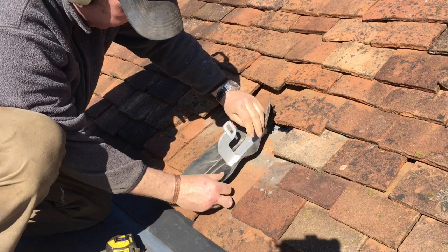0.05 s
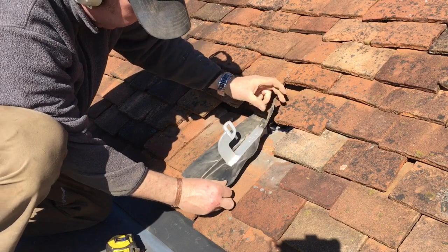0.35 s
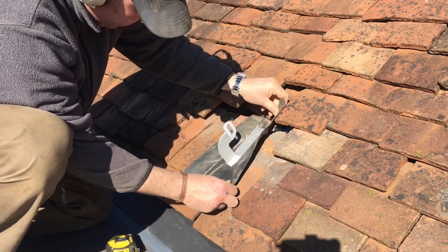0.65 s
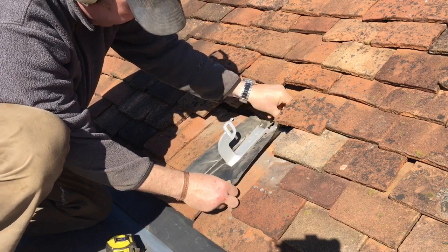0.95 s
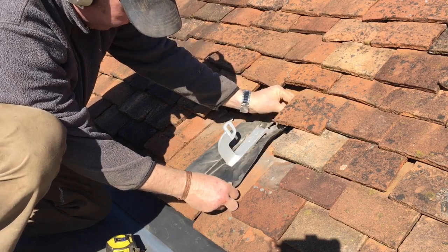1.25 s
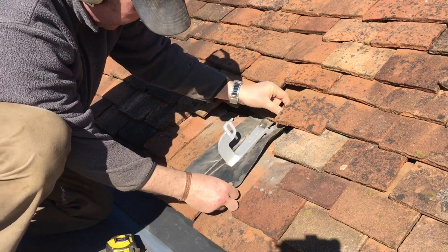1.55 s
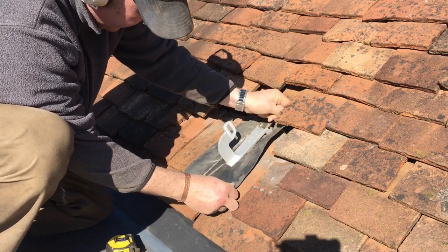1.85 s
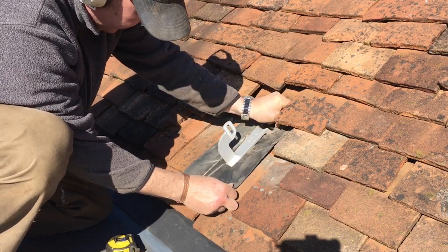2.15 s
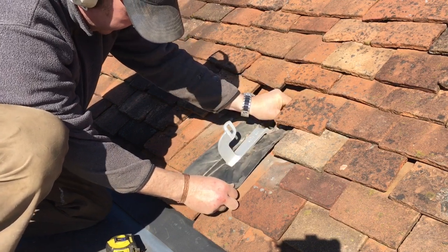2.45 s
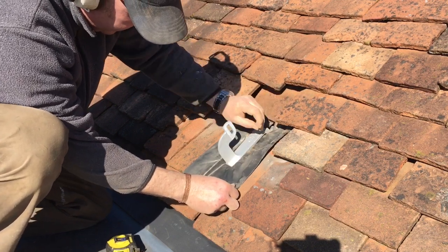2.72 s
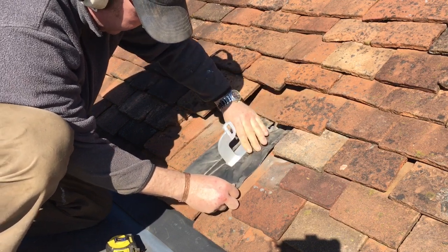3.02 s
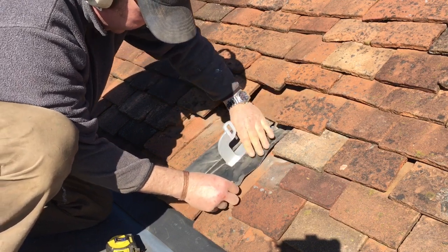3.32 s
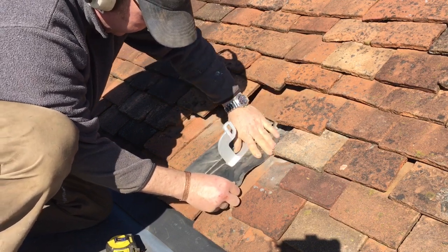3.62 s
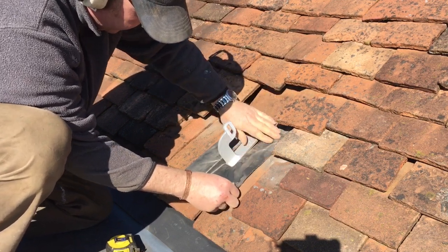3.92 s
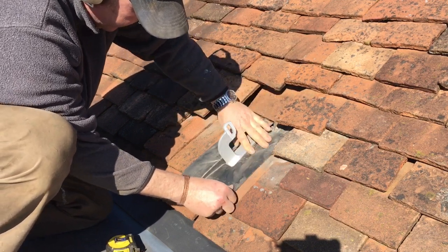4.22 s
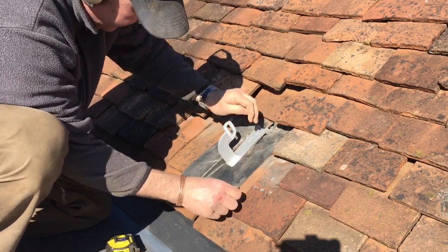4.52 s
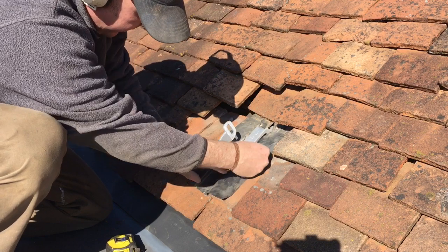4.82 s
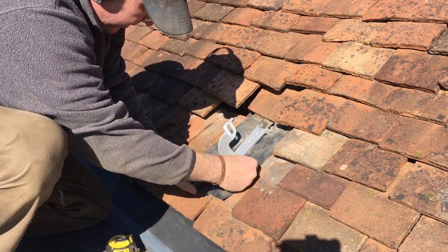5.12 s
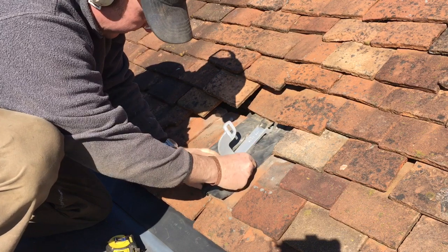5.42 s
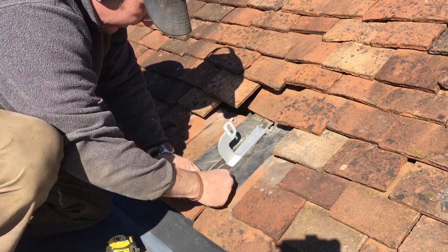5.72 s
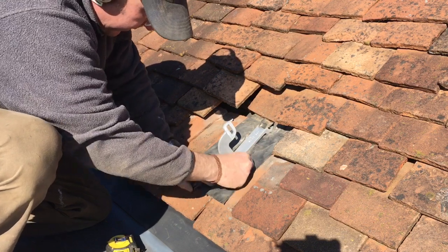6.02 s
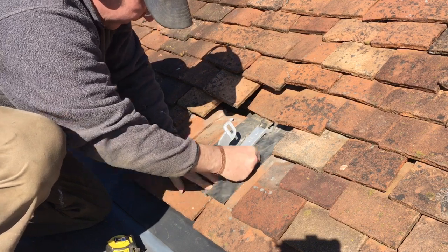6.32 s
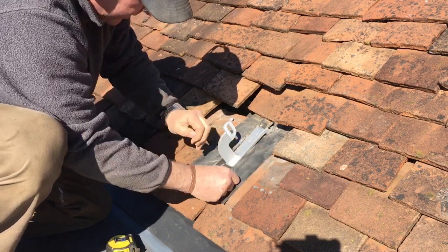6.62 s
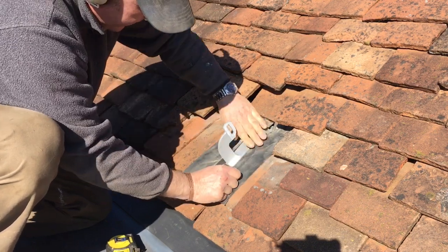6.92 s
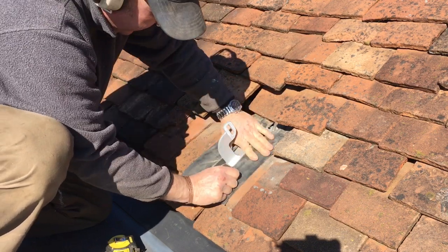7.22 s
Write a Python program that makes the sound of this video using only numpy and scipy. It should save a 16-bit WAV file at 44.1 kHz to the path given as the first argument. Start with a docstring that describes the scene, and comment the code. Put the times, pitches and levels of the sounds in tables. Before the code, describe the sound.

On a tiled roof, a loose clay tile is nudged by hand, grinding and ringing briefly, with dull thuds from the wood beneath. A palm rubs a metal sheet flat, a metal hook slides over grit in jerks, and the sheet scrapes across clay. Then the hook is lightly tapped into place. Sleeves swish throughout, light wind rumbles on the close microphone, and a few thin dry ticks come through.

```python
"""A roofer fits a metal hook and its flashing (a metal sheet) among clay tiles in a light wind.
First a loose tile is nudged, and it grinds and rings. At about 3 s a palm rubs the flashing flat,
then the hook slides over grit in jerks. Seated tiles clack, the flashing scrapes over the clay
near 5 s, and from 5.6 s the hook is tapped home. All along, sleeves swish, the battens (wooden
strips under the tiles) thud, wind rumbles on the microphone and a thin dry tick comes and goes."""
import sys
import numpy as np
from scipy import signal
from scipy.fft import rfft, irfft, next_fast_len
from scipy.io import wavfile
from scipy.ndimage import uniform_filter1d

SR = 44100
rng = np.random.default_rng(int(sys.argv[2]) if len(sys.argv) > 2 else 0)


def unload_wav(signal):
    """Save mono or channel-first audio to the path in sys.argv[1] as 16-bit WAV at rate SR, clipped to [-1, 1]."""
    wavfile.write(
        sys.argv[1],
        SR,
        np.round(np.clip(np.atleast_2d(signal).T, -1, 1) * 32767).astype(np.int16),
    )


N = 324135

# Levels in a table are relative: the functions add their own gains.
# A mode is a tone that an object rings at. Its ring time (t60) is how long it takes to fade by 60 dB.
# Jerks of the sliding hook: (time [s], contact length [s], level [dB], brightness [dB/octave])
HOOK_SLIDES = [(3.258, 0.011, -51.5, -2), (3.288, 0.0094, -54, -1.5), (3.415, 0.022, -61.5, -2.5),
               (3.445, 0.027, -48, -1), (3.53, 0.0066, -46.5, 0), (3.543, 0.0059, -51.5, -3),
               (3.557, 0.011, -52, 2), (3.576, 0.013, -46, -1), (3.62, 0.0072, -51, 0),
               (3.665, 0.016, -46.5, 0.5), (3.733, 0.0075, -48, -0.5), (3.751, 0.0078, -60.5, 4),
               (3.947, 0.032, -42.5, -1.5), (3.96, 0.019, -42, -3), (3.985, 0.024, -64, -7.5),
               (4.126, 0.0033, -50, -0.5), (4.139, 0.0055, -54.5, -1), (4.18, 0.011, -51.5, 1.5),
               (4.433, 0.0015, -57, 0.5)]
# Taps on the hook: (time [s], level [dB], brightness [dB/octave])
HOOK_TAPS = [(5.581, -55, -2), (5.622, -52.5, -1.5), (5.694, -60, 5), (5.715, -60.5, 2),
             (6.002, -53.5, 5.5), (6.068, -50, 0.5), (6.236, -59, -1), (6.39, -59.5, -1),
             (6.43, -51.5, 1.5), (6.506, -61, 0), (6.513, -49, 2.5), (6.801, -60, -1.5), (6.815, -40.5, 1),
             (6.859, -56.5, 0.5), (6.97, -70, 2), (7.026, -54.5, 2), (7.031, -62, 6.5), (7.048, -59, -1),
             (7.058, -66, 2), (7.093, -60.5, 1), (7.101, -51, 0.5), (7.123, -59, 3), (7.132, -56, 1),
             (7.138, -56.5, 0.5), (7.154, -65, 2), (7.161, -63, 2), (7.25, -59.5, 6), (7.285, -46.5, -1)]
# The hook's tones: (pitch [Hz], level when slid [dB], level when tapped [dB], free ring time [s])
HOOK_MODES = [(345, -7, -12, 0.07), (666, -11, -21, 0.066), (1026, -1.5, -3.5, 0.05),
              (1220, 1.5, 3.5, 0.026), (1559, 5, 1, 0.067), (1620, 5, -7, 0.01), (1775, -10, -13, 0.056),
              (2105, 5, 3, 0.015), (2281, 2, 6.5, 0.054), (2420, -3, -1.5, 0.016), (2950, -3, -11, 0.06),
              (3150, -25, -3, 0.016), (3830, 1, -2.5, 0.028), (4360, -5, -20, 0.05), (4650, -14, -4, 0.047),
              (4960, -12, -3, 0.012), (6380, -9.5, -7, 0.15), (7170, -12, -12, 0.05),
              (7470, 2.5, -3, 0.036), (7700, -2, -9, 0.023), (8200, 0, -13, 0.025), (8640, 1, -14, 0.034),
              (9600, -5, -18, 0.033), (12480, -10, -26, 0.02)]
# Nudges of the loose tile and knocks on seated ones:
# (time [s], contact length [s], level [dB], brightness [dB/octave], freedom to ring [dB])
TILE_NUDGES = [(0.093, 0.0028, -66.5, 0.5, -8), (0.153, 0.0012, -67, -3.5, -2),
               (0.249, 0.0027, -79, 3.5, -10), (0.346, 0.025, -66.5, -3, 23), (0.548, 0.00099, -63, 0, -11),
               (0.584, 0.0083, -47.5, -0.5, 10), (0.652, 0.0067, -67.5, -0.5, -23),
               (0.68, 0.011, -75, -5, -10), (0.764, 0.0058, -64, -4, -12), (0.832, 0.013, -59.5, 0.5, -25),
               (1.017, 0.031, -67, 0.5, 0), (1.126, 0.00085, -63.5, -5.5, -12),
               (1.163, 0.025, -66.5, -6.5, -10), (1.397, 0.01, -66.5, -2, -1),
               (1.433, 0.00063, -67, -1, -2), (1.519, 0.00395, -54.5, -5, 9), (1.541, 0.0056, -64, -6, 4),
               (1.632, 0.0025, -71.5, -2, 3), (1.803, 0.011, -70.5, -5.5, -20),
               (1.812, 0.0014, -68.5, 3, -19), (1.89, 0.0065, -66.5, -6, -3),
               (1.975, 0.022, -68, -1.5, -17), (2.033, 0.0032, -61, 0.5, -15),
               (2.349, 0.0035, -60.5, -1, -24), (2.368, 0.0015, -64.5, 1.5, -8),
               (2.388, 0.002, -72.5, -4, -6), (2.508, 0.016, -62, 1.5, -27), (2.954, 0.0044, -64, -3.5, -9),
               (2.973, 0.0082, -57.5, -4.5, -13), (3.011, 0.0064, -62.5, -3.5, -12),
               (3.378, 0.0024, -72, -3, -10)]
TILE_KNOCKS = [(0.7275, 0.0027, -39, 2.5, 9.5), (4.214, 0.00067, -41.5, 0.9, -6.5),
               (4.812, 0.0016, -54, -2.5, -5.5), (4.848, 0.0012, -62.5, 0.5, -5),
               (4.989, 0.0012, -52.5, 2, -9), (5.183, 0.0032, -50, -1.5, -18),
               (5.275, 0.0013, -60, 3.5, -11), (5.323, 0.011, -58, 2.5, -8),
               (5.386, 0.018, -60.5, -0.5, -15), (5.905, 0.013, -62, 5, -6)]
# The hook's edge rasps on the loose tile: (time [s], contact length [s], level [dB], brightness [dB/octave])
TILE_RASPS = [(0.557, 0.036, -52, 3), (0.571, 0.0077, -48, -0.5), (1.495, 0.017, -52.5, -0.5),
              (1.538, 0.011, -61, 6.5), (1.663, 0.015, -55, -1.5), (1.784, 0.003, -55, 5.5),
              (2.034, 0.032, -48.5, -0.5), (2.928, 0.007, -45, -0.5), (2.966, 0.0037, -61, 8)]
# Tones of a loose and a seated tile: (pitch [Hz], level [dB], free ring time [s])
LOOSE_TILE_MODES = [(568, -16.5, 0.1), (740, -13, 0.087), (1300, 8, 0.45), (1397, 2, 0.096),
                    (1840, -4.5, 0.028), (2090, -1, 0.015), (2266, 1, 0.07), (2608, -0.5, 0.064),
                    (2840, -1.5, 0.016), (3280, -11, 0.035), (3430, 0, 0.062), (3930, -0.5, 0.023),
                    (4780, -8.5, 0.023), (5400, -13, 0.05), (6800, -15, 0.055), (7960, -7, 0.041),
                    (8600, -15, 0.038)]
SEATED_TILE_MODES = [(348, -6, 0.093), (944, 2.5, 0.035), (1360, -9, 0.14), (1493, 5.5, 0.025),
                     (2060, 2, 0.079), (2460, 0, 0.027), (3035, 2, 0.051), (3220, -1, 0.028),
                     (3890, -2, 0.025), (3984, -6, 0.04), (4390, 1, 0.022), (5220, -7, 0.033),
                     (6492, -5, 0.046), (7600, -8, 0.025), (7700, -7, 0.032), (8200, 3, 0.018),
                     (8660, 4, 0.036), (12500, -3, 0.023)]
# The noisy clatter around the tones of hook and tiles: (frequency [Hz], level [dB])
SLIDE_CLATTER = [(150, -30), (300, 1.5), (500, -6), (750, -7.5), (1100, 1.5), (1360, -13), (1600, -1),
                 (2240, -10), (2700, -14.5), (4300, -15.5), (5850, -24), (7690, -17), (10500, -21),
                 (12400, -19), (15000, -28)]
TAP_CLATTER = [(150, -34), (300, -7), (700, -6), (1100, 2), (1400, -4), (1820, 2), (2280, 2), (2750, -23),
               (3500, -6), (4680, -9), (5600, -33), (6710, -23), (7430, -31), (8820, -19), (15000, -27)]
LOOSE_CLATTER = [(150, 10), (250, 0), (650, -5), (1050, 2.5), (1320, 1.5), (1730, 2.5), (2700, -27),
                 (3940, -20), (5750, -35), (7820, -16), (15000, -57)]
KNOCK_CLATTER = [(150, 9), (300, -6), (650, -24), (930, -5), (1150, 1), (1500, 6), (2440, -8.5),
                 (4200, -14), (5600, -13), (8240, -16), (10500, -10), (12400, -16), (15000, -18)]
# Borders of the four bands that a contact is split into: (frequency [Hz])
BAND_EDGES_HZ = [250, 800, 2800, 6000, 15000]
# Mix of those bands for each kind of contact: (low [dB], middle [dB], high [dB], top [dB])
SLIDE_BANDS = [-10, -1, -3.5, -14.5]
TAP_BANDS = [-8, 3.5, -7, -16.5]
NUDGE_BANDS = [-2, 6, 3, -5.5]
RASP_BANDS = [-11, -8.5, -8, -32]
KNOCK_BANDS = [-3, -0.5, -2.5, -12.5]

# A rough clay edge grinds under the fingers: (start [s], length [s], level [dB])
GRINDS = [(0.93, 0.045, -64), (1.66, 0.06, -66), (2.892, 0.039, -47.5), (2.906, 0.038, -53),
          (2.958, 0.02, -54), (3.006, 0.024, -57), (3.078, 0.02, -53.5), (3.1, 0.043, -57),
          (3.182, 0.034, -55.5), (3.44, 0.04, -56), (3.55, 0.034, -62), (3.655, 0.032, -45)]
# That edge's resonances: (pitch [Hz], width [Hz], level [dB])
EDGE_RESONANCES = [(885, 47, 3), (1440, 33, 9), (1830, 24, 3), (2410, 85, 2), (2860, 94, 5.5),
                   (3100, 110, -1), (3260, 59, 9), (3780, 44, -5), (4870, 75, -32), (6300, 88, -37)]
# The flashing is drawn over the clay: (start [s], length [s], level [dB])
FLASHING_SCRAPES = [(4.996, 0.07, -51.5), (5.107, 0.044, -54.5), (5.136, 0.06, -53.5)]
# Its hollow sound halfway through a scrape: (frequency [Hz], level [dB])
FLASHING_SPECTRUM = [(700, -37), (1050, 2), (1500, -4), (2000, 2), (2600, -7.5), (3500, -9), (5000, -15.5)]
# Weight shifts on the battens: (time [s], level [dB], hardness [dB/octave])
THUDS = [(0.119, -63, 0), (0.73, -41, 28), (1.022, -45, 9), (1.165, -33, -6), (1.52, -35.5, 10),
         (1.884, -37, -1), (3.665, -54, 15), (3.951, -38.5, 4), (3.972, -37, 8), (4.129, -59, 16),
         (4.218, -46.5, 10), (5.997, -41.5, 3), (6.434, -48.5, -28), (6.609, -42, -0.5), (6.814, -47.5, -5)]
# The battens' tones: (pitch [Hz], level [dB], ring time [s])
BATTEN_MODES = [(123.3, 7.5, 0.053), (146, -14, 0.26), (176.1, 5, 0.13), (225.3, -11, 0.25),
                (280, -5.5, 0.1), (369, -11.5, 0.087)]
# The dull rattle of the tiles on them: (frequency [Hz], level [dB])
RATTLE_SPECTRUM = [(140, 3.5), (250, -3), (400, -5.5), (650, -3.5), (950, -23.5)]

# The arm moves and the hand drags grit: (start [s], length [s], sleeve level [dB], grit level [dB])
ARM_STROKES = [(0.083, 0.11, -70.5, -73.5), (0.596, 0.79, -79, -70), (0.913, 0.064, -67.5, -52),
               (0.997, 0.12, -72, -66.5), (1.131, 0.16, -67.5, -61.5), (1.347, 0.041, -92, -66.5),
               (1.496, 0.089, -68.5, -81), (1.646, 0.15, -78, -68), (1.842, 0.075, -64, -61.5),
               (2.018, 0.07, -72, -59.5), (2.337, 0.071, -71, -60.5), (2.502, 0.12, -63.5, -60),
               (2.857, 0.19, -92, -67), (3.398, 0.095, -70, -60), (3.534, 0.29, -64.5, -61.5),
               (3.798, 0.21, -60, -62.5), (4.103, 0.046, -66, -62.5), (4.219, 0.083, -70, -61),
               (4.42, 0.086, -67.5, -67), (4.622, 0.13, -78, -69.5), (4.782, 0.033, -72, -63),
               (4.874, 0.16, -60.5, -61), (4.944, 0.17, -65, -63.5), (5.158, 0.082, -64, -58),
               (5.253, 0.14, -70.5, -63), (5.435, 0.11, -62.5, -58.5), (5.5, 0.26, -57.5, -57),
               (5.57, 0.096, -59, -58), (5.772, 0.067, -68.5, -67), (5.83, 0.094, -60, -72),
               (5.925, 0.076, -62, -56.5), (5.999, 0.19, -59, -60.5), (6.211, 0.19, -59.5, -69),
               (6.331, 0.093, -55, -55), (6.441, 0.11, -57, -61), (6.51, 0.12, -61, -65.5),
               (6.586, 0.093, -65.5, -65), (6.696, 0.091, -70.5, -83), (6.993, 0.16, -63, -74),
               (7.149, 0.31, -60.5, -63), (7.207, 0.082, -66, -70)]
# The palm rubs the flashing flat: (start [s], length [s], level [dB])
PALM_RUBS = [(3.065, 0.042, -48), (3.082, 0.12, -50.5), (3.168, 0.084, -52), (3.27, 0.11, -63)]
# The hand leans on the loose tile: (start [s], end [s])
LEANS = [(1.48, 1.74), (2.95, 3.38)]
# The sound of the sleeve, of coarse grit and of fine grit: (frequency [Hz], level [dB])
SLEEVE_SPECTRUM = [(1180, -18), (2000, -45), (2800, -11.5), (3250, -4.5), (3480, -9), (4210, -4.5),
                   (5840, -7.5), (6370, -6.5), (6890, -7), (8330, -3.5), (10300, -13), (13500, -7.5),
                   (15800, -18)]
COARSE_GRIT = [(280, 9), (420, 10), (650, 7), (1200, 5)]
FINE_GRIT = [(1000, -7.5), (1500, -1), (2100, 1), (2800, -2.5), (4000, -4.5), (5500, -11)]

# Wind strength at the microphone: (time [s], level [dB])
GUSTS = [(0, -25), (0.42, -30), (0.51, -40), (0.6, -31), (0.95, -32.5), (1.4, -45), (1.65, -41),
         (1.82, -31), (2.3, -31), (2.42, -40), (2.55, -34), (2.72, -42), (2.92, -33.5), (3.4, -38),
         (3.6, -31.5), (3.95, -43), (4.22, -52), (4.42, -44), (4.7, -50), (4.82, -33), (5.05, -27),
         (5.3, -35), (5.45, -37), (6.0, -44.5), (6.6, -47), (6.9, -58), (7.3, -46)]
# The wind's slow sway and its deep buffeting: (frequency [Hz], level [dB])
SWAY_SPECTRUM = [(2, -3.5), (5, 0.5), (10, 5), (15, -13.5)]
BUFFET_SPECTRUM = [(22, -13), (30, 7), (45, -9), (70, -13.5), (100, -22.5), (160, -32.5)]
# The rumble of small swirls of air, and of the roof under load: (frequency [Hz], level [dB])
RUMBLE_SPECTRUM = [(53, -57), (90, 2.5), (151, -1.5), (187, -6), (269, -15), (416, -20), (465, -24),
                   (600, -31), (780, -63)]
# Thin dry ticks: (time [s], level [dB])
TICKS = [(0.9874, -32), (2.3111, -16), (3.6127, -25.5), (4.9349, -20.5), (6.2586, -15)]
# Faint scrapes further off: (start [s], length [s], level [dB])
FAR_SCRAPES = [(1.62, 0.59, -69), (2.02, 0.3, -80), (2.56, 0.4, -68.5), (4.26, 0.21, -71.5),
               (6.66, 0.46, -67)]
# Resonances of those scrapes and of the outdoor hush: (pitch [Hz], width [Hz], level [dB])
FAR_RESONANCES = [(586, 68, 0), (730, 36, 4.5), (1100, 60, -17), (1820, 70, 6), (2230, 88, 0.5),
                  (2980, 61, 0.5), (3530, 67, -4), (3890, 69, -8.5), (4560, 74, -8), (6550, 430, -17)]
AIR_RESONANCES = [(698, 210, -72.5), (3580, 54, -88)]
# The outdoor hush: (frequency [Hz], level [dB])
AIR_SPECTRUM = [(250, -21), (450, -5), (700, -23.5), (1100, -12), (2000, -16.5), (4000, -23.5), (6000, -25),
                (9000, -26.5), (15800, -29)]


def hook(held_t60=0.06, tap_length_s=0.0022):
    """Sliding and tapping ring the same metal tones in different shares; the hand keeps them short."""
    hz, slid_db, tapped_db, t60 = np.transpose(HOOK_MODES)
    t60 = np.minimum(t60, held_t60)

    def slid():
        return touch(zip(hz, slid_db, t60), ring_db=-1.5, spectrum=SLIDE_CLATTER,
                     crack_db=9, crack_t60=0.0073, tail_db=6.5, tail_t60=0.14)

    def tapped(freedom_db):
        return touch(zip(hz, tapped_db, t60), ring_db=freedom_db - 3, spectrum=TAP_CLATTER,
                     crack_db=1, crack_t60=0.0041, tail_db=5, tail_t60=0.062, vary_db=5)

    mean_db = np.mean([db for _, db, _ in HOOK_TAPS])
    # Harder taps free the hook to ring more.
    tap_rows = [(s, tap_length_s, db, brightness, 0.4 * (db - mean_db))
                for s, db, brightness in HOOK_TAPS]
    slides = contacts(HOOK_SLIDES, slid, SLIDE_BANDS, slip_db=-3, slips_per_s=2300)
    taps = contacts(tap_rows, tapped, TAP_BANDS, slip_db=-6.5, slips_per_s=2500)
    return from_db(2.5) * (slides + taps)


def tiles(held_t60=0.16):
    """The loose tile, nudged or rasped by the hook's edge, rings, cut short by the fingers; seated tiles give a
    brief clack."""
    held_modes = [(hz, db, min(t60, held_t60)) for hz, db, t60 in LOOSE_TILE_MODES]

    def loose(ring_db=3.5):
        return touch(held_modes, ring_db, LOOSE_CLATTER,
                     crack_db=10, crack_t60=0.0037, tail_db=3.5, tail_t60=0.17)

    def seated(ring_db):
        return touch(SEATED_TILE_MODES, ring_db, KNOCK_CLATTER,
                     crack_db=12.5, crack_t60=0.036, tail_db=1, tail_t60=0.21)

    nudges = contacts(TILE_NUDGES, loose, NUDGE_BANDS, slip_db=2, slips_per_s=1800)
    rasps = contacts(TILE_RASPS, loose, RASP_BANDS, slip_db=8, slips_per_s=2200)
    knocks = contacts(TILE_KNOCKS, seated, KNOCK_BANDS, slip_db=-2.5, slips_per_s=2500)
    return from_db(0.8) * (nudges + rasps) + from_db(0.5) * knocks


def touch(modes, ring_db, spectrum, crack_db, crack_t60, tail_db, tail_t60, vary_db=1.5):
    """One touch on hook or tile: a noisy crack, ringing tones and a tail scattered by the roof."""
    t = np.arange(SR // 6) / SR
    crack, tail = rng.standard_normal((2, len(t)))
    burst = crack * from_db(crack_db) * decay(t, crack_t60)
    burst += tail * from_db(tail_db) * decay(t, tail_t60)
    out = coloured(burst, spectrum) * rms(burst)
    for hz, db, t60 in modes:
        strength = from_db(db + ring_db + vary_db * rng.standard_normal()) * rng.choice([-1, 1])
        ring_t = t[:int(t60 * SR) + 2]
        tone = np.sqrt(2) * np.sin(2 * np.pi * hz * ring_t)
        out[:len(ring_t)] += strength * tone * decay(ring_t, t60)
    fade_out = np.minimum(1, (1 - t / t[-1]) * 2) ** 2
    return out * fade_out


def contacts(rows, body, bands_db, slip_db, slips_per_s, settle_s=0.0098, spots=3, pivot_hz=1770):
    """Each contact is a hit, then tiny slips at a few rough spots, with its own level and brightness."""
    out, edges, size = np.zeros(N), np.array(BAND_EDGES_HZ), SR // 16
    band_octaves = np.log2(np.sqrt(edges[:-1] * edges[1:]) / pivot_hz)
    for s, length, level_db, brightness, *freedom in rows:
        progress = np.arange(size) / SR / max(length, 1e-3)
        arch = np.sqrt(np.maximum(0, progress * (1 - progress)))
        force = from_db(slip_db) * grains(size, slips_per_s, 1) * arch
        force[0] += 1   # the first hit
        spot = rng.integers(0, spots, size)
        sound = sum(signal.fftconvolve(force * (spot == k), body(*freedom)) for k in range(spots))
        for low, high, db in zip(edges, edges[1:], level_db + brightness * band_octaves + bands_db):
            part = filtered(sound, [low, high], "band")
            add(out, s, from_db(db) * part / rms(part[:int((length + settle_s) * SR)]))
    return out


def grinding():
    """A rough clay edge slips thousands of times a second, which sets its resonances sounding."""
    return strokes(GRINDS, squareness=1.26) * resonant(grains(N, 4000, 3.4), EDGE_RESONANCES)


def flashing(rise_octaves=0.4):
    """Grit under the metal edge makes a hollow scrape that climbs in pitch as the edge speeds up."""
    out = np.zeros(N)
    for start, length, db in FLASHING_SCRAPES:
        progress = np.clip((np.arange(N) / SR - start) / length, 0, 1)
        position = np.cumsum(2 ** (rise_octaves * (progress - .5))) % N
        grit = coloured(grains(N, 4100, 1.5), FLASHING_SPECTRUM)
        rising_grit = np.interp(position, np.arange(N), grit)
        out += strokes([(start, length, db)], squareness=3.7) * rising_grit
    return out


def battens(push_s=0.0035, rattle_db=-3, rattle_t60=0.066):
    """A push makes the wood thud and its tiles rattle; its hardness value lifts the higher tones."""
    out, t = np.zeros(N), np.arange(SR // 3) / SR
    lowest_hz = BATTEN_MODES[0][0]
    for s, level_db, hardness in THUDS:
        detune = 1 + .04 * rng.standard_normal()
        wood = np.zeros(len(t))
        for hz, db, t60 in BATTEN_MODES:
            loudness = from_db(db + hardness * np.log2(hz / lowest_hz) - 60 * t / t60)
            wood += loudness * np.sin(2 * np.pi * (hz * detune * t + rng.random()))
        rattle = noise(RATTLE_SPECTRUM, len(t)) * from_db(rattle_db + hardness - 60 * t / rattle_t60)
        thud = (wood + rattle) * (1 - np.exp(-t / push_s))
        add(out, s, from_db(level_db + 4) * thud / np.abs(thud).max())
    return out


def sleeves(fold_flicker_db=2.6, sheen_hz=10300):
    """Fleece fibres swish and snag, folds make the swish flicker, and slow strokes lose its top."""
    fibres = coloured(grains(N, 14000, 1.1), SLEEVE_SPECTRUM) * from_db(fold_flicker_db * drift(60))
    snags = coloured(grains(N, 250, 3.5), SLEEVE_SPECTRUM) * from_db(-9)
    speed = strokes([(start, length, db) for start, length, db, _ in ARM_STROKES], squareness=4.15)
    swish = filtered(fibres + snags, sheen_hz, "low")
    sheen = filtered(fibres + snags, sheen_hz, "high") * from_db(1) * (speed / speed.max()) ** 0.45
    return from_db(3) * speed * (swish + sheen)


def rubbing():
    """Hands roll grit over the clay and snap crumbs, while the arm's weight rumbles in the roof."""
    grit = grains(N, 2200, 3.5) * from_db(2.3 * drift(90))
    drag = strokes([(start, length, db) for start, length, _, db in ARM_STROKES], squareness=4.1)
    palm = strokes(PALM_RUBS, squareness=1.9)
    coarse = (from_db(-6) * drag + palm) * coloured(grit, COARSE_GRIT)
    fine = (drag + from_db(-12.5) * palm) * coloured(grit, FINE_GRIT)
    crumbs = from_db(-18.5) * drag * coloured(grains(N, 170, 1.3), FINE_GRIT)
    weight = from_db(-3.5) * (drag + palm) * noise(RUMBLE_SPECTRUM)
    return crumbs + weight + from_db(-2.5) * fine + from_db(-1) * (coarse + rubbed_tile(fine))


def rubbed_tile(grit, ease_s=0.037):
    """Rolling grit sets the loose tile ringing, far more while the hand leans on it."""
    t = np.arange(N) / SR
    leaning = sum(np.clip(np.minimum(t - start, end - t) / ease_s + .5, 0, 1) for start, end in LEANS)
    pressure_db = -15 + 22 * leaning
    return sum(resonance(grit * from_db(pressure_db + db / 2), hz, np.log(1000) / (np.pi * t60))
               for hz, db, t60 in LOOSE_TILE_MODES)


def wind():
    """Air sways and buffets on the microphone; small swirls rumble and swell with the same gusts."""
    gust_db = np.interp(np.arange(N) / SR, *np.transpose(GUSTS)) + drift(12)
    swing_db = gust_db - gust_db.mean()
    sway = from_db(-25 + .5 * swing_db) * levelled(noise(SWAY_SPECTRUM), span_s=0.54)
    buffets = from_db(gust_db - 2) * levelled(noise(BUFFET_SPECTRUM), span_s=0.49)
    flutter_db = 3 * drift(30)
    breeze_db = uniform_filter1d(swing_db, SR // 3)
    swirls = from_db(-62.5 + 0.69 * breeze_db + flutter_db) * noise(RUMBLE_SPECTRUM)
    end_fades = signal.windows.tukey(N, .008)
    return (sway + buffets + swirls) * end_fades


def ticks(width_s=.00002):
    """Each dry tick is one narrow spike with no ring."""
    out, t = np.zeros(N), np.arange(-8, 9) / SR
    for s, db in TICKS:
        add(out, s + t[0], -from_db(db) * np.exp(-.5 * (t / width_s) ** 2))
    return out


def far_scraping():
    """Further off, the tiny slips of something scraping make a faint hollow tone."""
    return strokes(FAR_SCRAPES, squareness=3) * resonant(grains(N, 6000, 0.72), FAR_RESONANCES)


def settling_crumbs():
    """Now and then a crumb of clay settles by itself with a tiny rustle."""
    t = np.arange(SR // 8) / SR
    rustle = decay(t, t60=0.044) * grains(len(t), 6000, 2)
    crumbs = grains(N, per_s=3, spread_db=2.5)
    return from_db(-80.5) * coloured(signal.fftconvolve(crumbs, rustle)[:N], FINE_GRIT)


def air():
    """A quiet outdoor hush with two faint resonances."""
    out = from_db(-72) * noise(AIR_SPECTRUM)
    for hz, width_hz, db in AIR_RESONANCES:
        peak = resonance(rng.standard_normal(N), hz, width_hz)
        out += from_db(db) * peak / rms(peak)
    return out


def strokes(rows, squareness, rise_share=0.39, edge_db=16):
    """Loudness of strokes (start [s], length [s], level [dB]) that each swell and ease off."""
    t, power = np.arange(N) / SR, np.zeros(N)
    for start, length, db in rows:
        rise, fall = length * np.array([rise_share, 1 - rise_share]) + 1e-4
        near = t[(t > start - rise) & (t < start + rise + 2 * fall)]
        after_peak = near - start - rise
        distance = np.abs(after_peak / np.where(after_peak < 0, rise, fall))
        add(power, near[0], from_db(db - edge_db * distance ** squareness) ** 2)
    return np.sqrt(power)


def grains(size, per_s, spread_db):
    """Random clicks of uneven strength."""
    clicks = rng.random(size) < per_s / SR
    signs = rng.choice([-1, 1], size)
    return clicks * signs * from_db(spread_db * np.minimum(rng.exponential(1, size), 4))


def coloured(x, spectrum):
    """Shape a sound with a spectrum that falls away beyond its ends; the result has rms 1."""
    hz, db = np.transpose(spectrum)
    size = next_fast_len(len(x))
    freqs = np.arange(size // 2 + 1) * SR / size + 1e-3
    roll_off = np.minimum(1, np.minimum(freqs / hz[0], hz[-1] / freqs)) ** 3
    gain = roll_off * from_db(np.interp(np.log(freqs), np.log(hz), db))
    shaped = irfft(rfft(x, size) * gain, size)[:len(x)]
    return shaped / rms(shaped)


def noise(spectrum, size=N):
    """Steady noise with the given spectrum."""
    return coloured(rng.standard_normal(size), spectrum)


def resonance(x, hz, width_hz):
    """Let a sound ring around one pitch; a narrower width rings longer."""
    radius = np.exp(-np.pi * width_hz / SR)
    feedback = [1, -2 * radius * np.cos(2 * np.pi * hz / SR), radius ** 2]
    return signal.lfilter(np.array([1, 0, -1]) * (1 - radius ** 2) / 2, feedback, x + 1e-18)


def resonant(x, peaks):
    """Ring several resonances at once; the result has rms 1."""
    ringing = sum(from_db(db) * resonance(x, hz, width_hz) for hz, width_hz, db in peaks)
    return ringing / rms(ringing)


def filtered(x, hz, kind):
    """Keep the lows, the highs or one band."""
    return signal.sosfilt(signal.butter(3, hz, kind, fs=SR, output="sos"), x)


def levelled(x, span_s):
    """Even out slow changes in loudness."""
    return x / np.sqrt(np.abs(uniform_filter1d(x ** 2, int(span_s * SR))) + 1e-9)


def drift(per_s):
    """A curve that glides from one random value to the next."""
    values = rng.standard_normal(4000)
    return np.interp(np.arange(N) / SR * per_s, np.arange(len(values)), values)


def decay(t, t60):
    """A fading curve with a total energy of 1."""
    fall = from_db(-60 * t / t60)
    return fall / np.sqrt(np.sum(fall ** 2))


def add(out, s, sound):
    """Mix a sound in at s seconds."""
    i = max(0, round(s * SR))
    out[i:i + len(sound)] += sound[:N - i]


def from_db(db):
    """Turn decibels into a gain."""
    return 10 ** (np.asarray(db) / 20)


def rms(x):
    """A signal's average size (root mean square)."""
    return np.sqrt(np.mean(x ** 2) + 1e-24)


def scene():
    """The roof work and its background, at one microphone."""
    mix = tiles() + hook() + grinding() + far_scraping() + flashing() + battens()
    mix += sleeves() + rubbing() + settling_crumbs() + wind() + ticks() + air()
    return mix[None]


def record(dry, cutoff_hz=15900):
    """Cut the very highest treble steeply."""
    return signal.sosfilt(signal.ellip(10, .1, 80, cutoff_hz, fs=SR, output="sos"), dry)


dry = scene()
out = record(dry)
unload_wav(out)
```